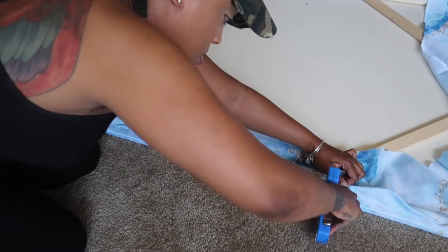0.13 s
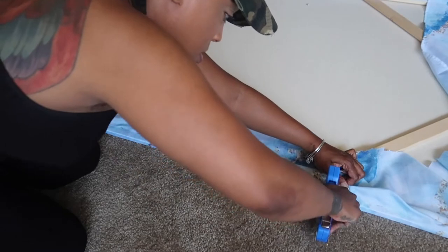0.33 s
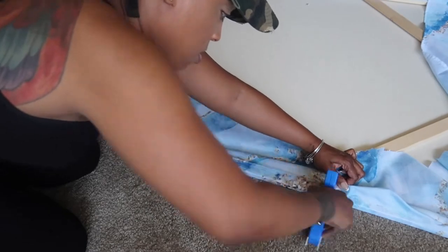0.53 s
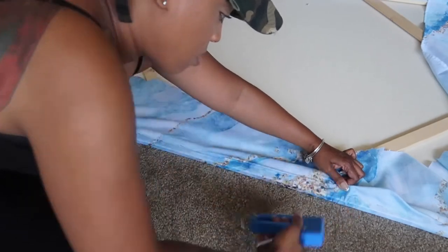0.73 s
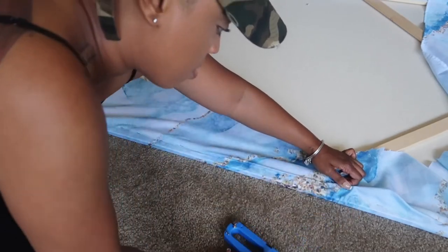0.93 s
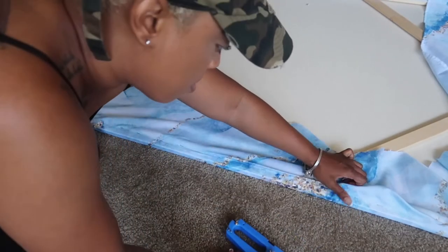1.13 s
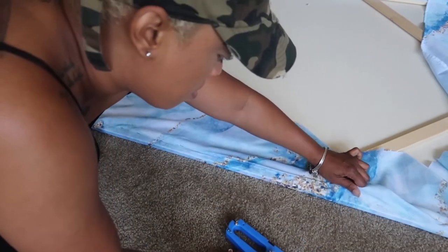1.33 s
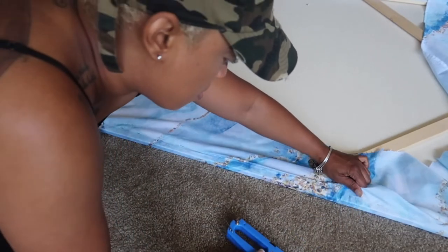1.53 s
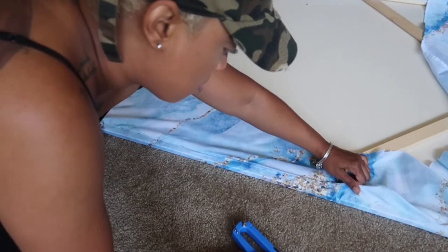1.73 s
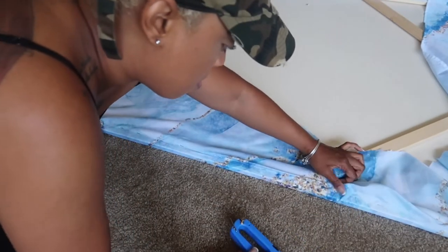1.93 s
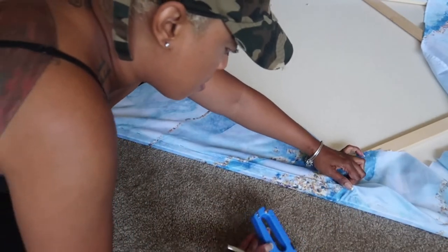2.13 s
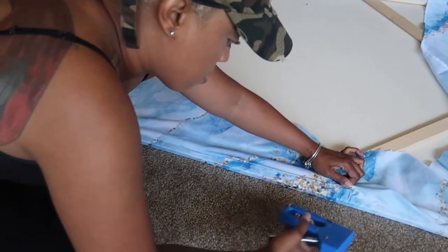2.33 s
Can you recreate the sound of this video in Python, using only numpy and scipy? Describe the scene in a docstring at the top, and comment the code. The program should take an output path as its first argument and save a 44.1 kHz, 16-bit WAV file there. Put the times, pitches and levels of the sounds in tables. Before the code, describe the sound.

A hand staple gun clicks, then fires one loud sharp clack into a wooden frame indoors.

```python
"""Throughout: room tone whose level flickers by band, and a low wavering drone, both filtered noise.
A hand-held staple gun is squeezed: its mechanism clicks, runs of touches ringing body modes.
A rough rush, then the shot and rebound into a wooden frame on a carpeted floor: body, frame, crack.
The shot overloads the recorder; its gain control ducks, holds and slowly recovers.
More clicks follow and the gun is laid down; cloth swishes and rustles, as banded noise."""
import sys
import numpy as np
from scipy import signal
from scipy.io import wavfile
from scipy.ndimage import uniform_filter1d, minimum_filter1d

SR = 44100
rng = np.random.default_rng(int(sys.argv[2]) if len(sys.argv) > 2 else 0)


def transcribe(u):
    """Save the signal u as a 16-bit wav file named by the first command-line argument.

    u: samples, shape (n,) or (channels, n), limited to [-1, 1]; the rate is SR.
    q: integer samples, one column per channel.
    """
    v = np.clip(np.atleast_2d(u).T, -1, 1)
    q = np.round(v * 32767).astype(np.int16)
    wavfile.write(sys.argv[1], SR, q)


def gain_from_decibels(decibels):
    """Convert decibel values to linear amplitude factors."""
    exponent = np.asarray(decibels, float) / 20
    return 10 ** exponent


N = 105840

# room tone spectrum, relative: f/Hz, level per Hz/dB
ROOM_TONE_SPECTRUM = [(20, -11.5), (50, -15), (75, -14.5), (110, -19.5), (165, -13), (225, -3), (350, -11),
                      (560, -12.5), (800, -18.5), (1400, -20.5), (2500, -26), (4500, -36), (7300, -40.5),
                      (12000, -46), (15500, -47)]
# left-right correlation of diffuse noise: f/Hz, correlation/1
STEREO_CORRELATION = [(60, 0.94), (150, 0.88), (380, 0.87), (950, 0.76), (2380, 0.92), (5980, 0.19),
                      (15000, -0.94)]
# fabric rustle envelope, before RUSTLE_GAIN_DB and drift: t/s, level/dB
RUSTLE_ENVELOPE = [(1.3, -64), (1.5, -64), (1.7, -56), (1.9, -56.5), (2.1, -58), (2.28, -54), (2.4, -68)]
# fabric rustle spectrum, relative, before drift: f/Hz, level per Hz/dB
FABRIC_SPECTRUM = [(500, -22), (1200, 1.5), (2500, 7), (4000, -3.5), (6000, -9.5), (9000, -29),
                   (15000, -19)]
# short swishes of cloth: t/s, peak level per band/dB, centre f/Hz, half length/s
SWISHES = [(0.602, -57.5, 6900, 0.032), (1.535, -52.5, 3120, 0.057), (1.606, -65, 5900, 0.023),
           (1.836, -60, 4930, .025), (2.003, -62.5, 2740, 0.08), (2.273, -77, 9000, 0.031)]
# room tail spectrum, relative: f/Hz, level/dB
TAIL_SPECTRUM = [(100, -7), (400, 0), (1500, -5), (3000, -8), (6000, 5), (14000, 3.5)]
# room tail decay: f/Hz, t60/s
TAIL_T60 = [(100, 0.39), (400, 0.26), (1500, 0.52), (3000, 0.48), (6000, 0.46), (14000, 0.4)]
# steel and plastic body of the gun: f/Hz, level/dB, t60/s
BODY_MODES = [(790, -7, .015), (1226, -11, .012), (1630, -5.5, .012), (1898, -3.5, 0.015),
              (2131, -5.5, 0.013), (2350, -5.5, 0.0084), (2592, -8.5, 0.031), (2979, -2.5, 0.0097),
              (3278, -4, 0.011), (3703, -3.5, 0.0076), (4174, -8, .01), (4746, -8, 0.0064),
              (5400, -12, 0.0035), (6350, -7.5, 0.0043), (7510, -9.5, 0.0027), (12180, -18, 0.0017),
              (13500, -17.5, 0.0037)]
# wooden frame and stretched cloth: f/Hz, level/dB, t60/s
FRAME_MODES = [(105.5, -28.5, 0.017), (230, -22, 0.019), (305.6, -17.5, 0.029), (355.4, -19.5, 0.046),
               (422, -18.5, .02), (555, -18.5, 0.037), (617, -17, 0.029), (735, -16.5, 0.036),
               (930, -21.5, 0.026), (958, -17.5, 0.038), (1204, -26, 0.06)]
# clicks of lever, spring and casing: t/s, level before CLICK_GAIN_DB/dB, excitation centre f/Hz,
# width each side of centre/octaves, chatter length/s, crack relative to click/dB
CLICKS = [(.030, -37.5, 1930, .5, .004, -24), (0.142, -37.5, 1500, .5, 0.0026, -19.5),
          (0.159, -34.5, 3100, 0.39, 0.0025, -12.5), (0.1769, -8, 1940, 1.5, 0.0012, 0),
          (0.18, -12, 1700, 1.84, 0.024, -15.5), (0.2099, -3, 4160, 0.47, 0.0022, -4.5),
          (0.214, -18, 3494, 0.72, 0.026, -6.5), (0.233, -21, 4700, 0.27, 0.0025, -15),
          (.257, -22, 3330, 0.18, 0.0048, -18.5), (0.3174, -3.5, 2350, 0.15, 0.0047, -27),
          (0.3181, -5.5, 4230, 0.18, 0.0032, -22.5), (0.5739, -24, 3400, 0.65, 0.0023, -6),
          (0.5876, -12, 4640, 0.39, 0.00116, -18.5), (0.589, -15.5, 1630, .4, 0.014, -21),
          (0.6657, -10, 1796, .4, .003, -9.5), (.682, -20, 2740, 1.28, 0.014, -17),
          (.821, -26.5, 2700, 0.86, 0.00402, -9.5), (.8335, -30, 2870, 0.97, 0.00322, -19.5),
          (0.88, -28.5, 2660, 0.71, 0.0028, -22), (0.889, -31.5, 2660, 0.65, .002, -23),
          (0.974, -21.5, 2150, 2.6, 0.0023, -12), (0.978, -20, 1480, .9, 0.0079, -16.5),
          (0.987, -19.5, 1481, 1.07, 0.0025, -15), (1.022, -33.5, 2500, 1.09, 0.0026, -16.5),
          (1.129, -39.5, 3500, .8, 0.00582, -20.5), (2.1192, -24.5, 3500, 0.43, 0.0017, -17),
          (2.122, -29, 1990, 0.67, 0.0067, -23), (2.206, -35.5, 3300, .8, .014, -20),
          (2.245, -30.5, 3020, 1.04, .003, -8.5), (2.2969, -24, 2920, 0.1, 0.0021, -22)]
# rough rush just before the blow: t/s, level/dB, chatter length/s, crack relative to it/dB
RUSH = [(0.3313, -14, .02, 3)]
# driver blade slams home and rebounds: t/s, level/dB, chatter length/s, crack relative to it/dB
SHOT = [(0.3410, 9, .0045, -1), (0.3520, -1, .006, -4)]

ROOM_TONE_DB, FLICKER_AT_100_HZ_DB, FLICKER_FALL_EXPONENT = -45.5, 2.5, 0.2
DRONE_HZ, DRONE_WIDTH_HZ, DRONE_DB = 107, 24, -44.5
RUSTLE_GAIN_DB, SWISH_WIDTH_OCT = -1.5, 0.6
TAIL_DB, TAIL_RISE_S = -4.5, 0.0016
CHATTER_PER_S, CHATTER_SWELL_S = 2700, 0.00025
CLICK_GAIN_DB, CRACK_HZ, CRACK_T60_S = -1.5, 10800, 0.00043
LEFT_LAG_S, LEFT_RE_RIGHT_DB = 2.5e-5, -1.3
AGC_START_DB, AGC_CUT_DB_PER_DB, AGC_WINDOW_S = -18, 0.44, 0.0087
AGC_ATTACK_S, AGC_HOLD_S, AGC_RECOVERY_DB_PER_S = 0.06, 0.46, 11
CLIP_HARDNESS = 6.0


def at_hz(points, hz):
    """Table read on a log-frequency axis."""
    return np.interp(np.log(hz), np.log(np.array(points)[:, 0]), np.array(points)[:, 1])


def rms_one(x):
    """Scaled to rms 1."""
    return x / np.sqrt(np.mean(x ** 2) + 1e-20)


def drift(rate_hz):
    """Slow random wander of rms 1: two-pole low-passed noise, one point per 40 samples."""
    pole = np.exp(-2 * np.pi * rate_hz * 40 / SR)
    noise = rng.standard_normal(N // 40 + 2002)
    slow = signal.lfilter([1], [1, -2 * pole, pole ** 2], noise)[2000:]  # settled part
    return np.interp(np.arange(N) / 40, np.arange(len(slow)), rms_one(slow))


def bandpass(x, edges_hz):
    """Butterworth band-pass."""
    return signal.sosfilt(signal.butter(2, edges_hz, "band", fs=SR, output="sos"), x)


def bands(size):
    """Half-octave bands of stereo noise, left and right correlated by frequency."""
    edges_hz = 22 * 2 ** np.arange(0, 9.6, 0.5)
    white = rng.standard_normal((2, 2, size))
    for k, (low_hz, high_hz) in enumerate(zip(edges_hz, edges_hz[1:])):
        mid, side = bandpass(white[k % 2], [low_hz, high_hz])  # neighbours draw on separate noise
        hz = np.sqrt(low_hz * high_hz)
        alike = np.clip(at_hz(STEREO_CORRELATION, hz), -1, 1)
        yield hz, np.sqrt(1 + alike) * mid + np.sqrt(1 - alike) * side * [[1], [-1]]


def ring(drive, hz, t60_s):
    """Two-pole resonator: a unit click starts a decaying sine of height 1."""
    r, w = gain_from_decibels(-60 / (t60_s * SR)), 2 * np.pi * hz / SR
    return signal.lfilter([0, np.sin(w)], [1, -2 * r * np.cos(w), r * r], drive + 1e-18)


def room_tone():
    """Shaped noise; each band's level flickers independently, less in the treble."""
    tone = 0
    for hz, band in bands(N):
        flicker_db = FLICKER_AT_100_HZ_DB * (100 / hz) ** FLICKER_FALL_EXPONENT * drift(14)
        tone = tone + gain_from_decibels(at_hz(ROOM_TONE_SPECTRUM, hz) + flicker_db) * band
    return gain_from_decibels(ROOM_TONE_DB) * rms_one(tone)


def drone():
    """Low wavering drone: noise through one broad resonance."""
    noise = rng.standard_normal(N)
    return gain_from_decibels(DRONE_DB) * rms_one(ring(noise, DRONE_HZ, 2.0 / DRONE_WIDTH_HZ))


def rustle(cloth):
    """Fabric friction: noise bands that drift apart, under a drifting envelope."""
    t = np.arange(N) / SR
    envelope_db = np.interp(t, *np.transpose(RUSTLE_ENVELOPE), left=-90)
    level_db = envelope_db + RUSTLE_GAIN_DB + 2.9 * drift(13)
    fabric = sum(gain_from_decibels(at_hz(FABRIC_SPECTRUM, hz) + 4.5 * drift(3.2)) * band for hz, band in cloth)
    return gain_from_decibels(level_db) * rms_one(fabric)


def swishes(cloth):
    """Cloth strokes: noise bands above 900 Hz, bell-shaped in time and log frequency."""
    t = np.arange(N) / SR
    out = np.zeros((2, N))
    for hz, band in cloth:
        if hz <= 900:
            continue
        envelope = 0
        for s, db, centre_hz, half_s in SWISHES:
            band_db = db - 7.2 * (np.log2(hz / centre_hz) / SWISH_WIDTH_OCT) ** 2
            envelope = envelope + gain_from_decibels(band_db) * np.exp(-((t - s) / half_s) ** 2)
        out += rms_one(band) * envelope
    return out


def background():
    """Room tone, drone and cloth; rustle and swishes share one noise."""
    cloth = list(bands(N))
    return room_tone() + drone() + rustle(cloth) + swishes(cloth)


def room(x):
    """Diffuse tail: noise that rises fast and dies band by band."""
    t = np.arange(SR // 2 * 2) / SR
    tail = 0
    for hz, band in bands(len(t)):
        tail = tail + gain_from_decibels(at_hz(TAIL_SPECTRUM, hz) - 60 * t / at_hz(TAIL_T60, hz)) * band
    tail = tail * (1 - np.exp(-t / TAIL_RISE_S))
    tail = tail / np.sqrt(np.sum(tail ** 2) / 2)  # mean channel energy 1
    return gain_from_decibels(TAIL_DB) * signal.fftconvolve(x[None], tail, axes=1)[:, :N]


def chatter(length_s):
    """A contact: dense run of uneven touches that swells quickly and dies away."""
    draw, t = rng.random((3, 4096)), np.arange(4096) / SR
    sign = np.sign(draw[2] - 0.5)
    touches = (draw[0] < CHATTER_PER_S / SR) * (draw[1] + 0.1) * sign
    touches[4] = sign[4]  # at least one touch
    return touches * np.minimum(t / CHATTER_SWELL_S, 1) * np.exp(-(t / max(length_s, 2e-4)) ** 2)


def strike(hits, modes):
    """Hits (t/s, level/dB, chatter/s, centre/Hz, width/octaves) ring modes, then keep their own band."""
    out, click = np.zeros(N + 4096), np.eye(1, 4096)[0]
    for s, db, length_s, centre_hz, width_oct in hits:
        sound = 0
        for hz, mode_db, t60_s in modes:
            ringing = rms_one(ring(chatter(length_s), hz, t60_s))
            click_level = np.std(ring(click, hz, t60_s))  # gives the mode one click's energy
            sound = sound + gain_from_decibels(mode_db) * ringing * click_level
        edges_hz = np.clip(centre_hz * np.exp2(width_oct * np.array([-1, 1])), 30, 0.45 * SR)
        out[int(s * SR):][:4096] += gain_from_decibels(db) * bandpass(sound, edges_hz)
    return out[:N]


def body_and_crack(hits, crack_db):
    """Contacts ring the gun body; each adds a very short treble crack at its own relative level."""
    cracks = [(s, db + rel_db, length_s, CRACK_HZ, 1.1)
              for (s, db, length_s, *_), rel_db in zip(hits, crack_db)]
    return strike(hits, BODY_MODES) + strike(cracks, [(CRACK_HZ, 0, CRACK_T60_S)])


def clicks():
    """Mechanism contacts favour the body modes near their own centre."""
    hits = [(s, db + CLICK_GAIN_DB, length_s, centre_hz, width_oct)
            for s, db, centre_hz, width_oct, length_s, _ in CLICKS]
    return body_and_crack(hits, [row[-1] for row in CLICKS])


def rush():
    """Rough chatter ahead of the blow, over a wide band of body modes."""
    return body_and_crack([(*row[:3], 2500, 2.5) for row in RUSH], [row[-1] for row in RUSH])


def shot():
    """Blade impact and rebound ring a wide band of body modes, and the frame."""
    body = body_and_crack([(*row[:3], 2500, 2.5) for row in SHOT], [row[-1] for row in SHOT])
    return body + strike([(*row[:3], 400, 2.8) for row in SHOT], FRAME_MODES)


def scene():
    """Gun slightly to the right (left later and weaker), in its room."""
    gun, t = clicks() + rush() + shot(), np.arange(N) / SR
    left = np.interp(t - LEFT_LAG_S, t, gun) * gain_from_decibels(LEFT_RE_RIGHT_DB / 2)
    right = gun * gain_from_decibels(-LEFT_RE_RIGHT_DB / 2)
    return np.array([left, right]) + room(gun) + background()


def top_cut(x):
    """Nothing passes above the cut-off."""
    return signal.sosfilt(signal.butter(12, 15610, fs=SR, output="sos"), x)


def record(dry):
    """Gain control with smoothed attack, hold and slow recovery, then soft overload at full scale."""
    power = uniform_filter1d(np.mean(dry ** 2, axis=0), int(AGC_WINDOW_S * SR))
    level_db = 10 * np.log10(power + 1e-12)
    cut_db = AGC_CUT_DB_PER_DB * np.maximum(level_db - AGC_START_DB, 0)
    # hold: largest cut of the past AGC_HOLD_S
    hold = int(AGC_HOLD_S * SR)
    padded_db = np.r_[np.zeros(hold), -cut_db]
    cut_db = -minimum_filter1d(padded_db, 2 * (hold // 2) + 1)[hold // 2:][:N]
    # recovery: the cut falls no faster than the ramp
    ramp_db = AGC_RECOVERY_DB_PER_S * np.arange(N) / SR
    cut_db = np.maximum.accumulate(cut_db + ramp_db) - ramp_db
    r = np.exp(-1 / (AGC_ATTACK_S * SR))
    x = dry * gain_from_decibels(-signal.lfilter([1 - r], [1, -r], cut_db))
    mix = x / (1 + np.abs(x) ** CLIP_HARDNESS) ** (1 / CLIP_HARDNESS)
    return top_cut(mix)


dry = scene()
out = record(dry)
transcribe(out)
```